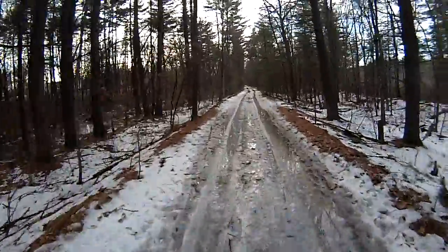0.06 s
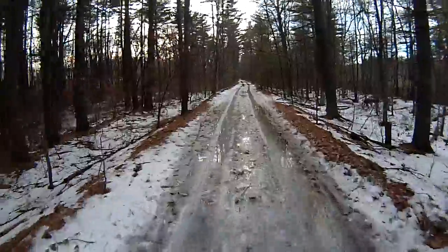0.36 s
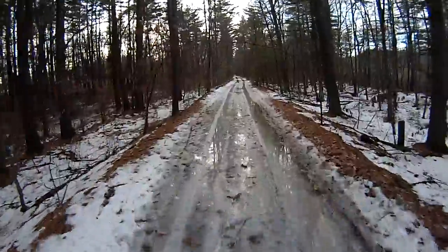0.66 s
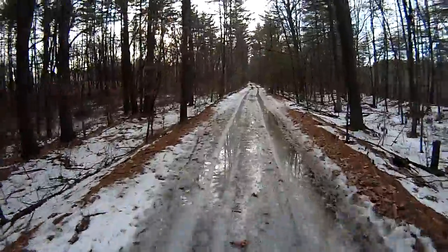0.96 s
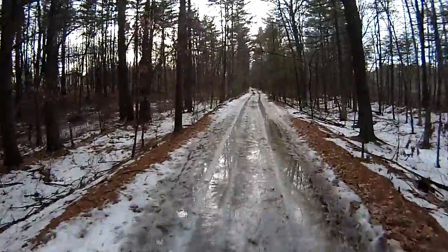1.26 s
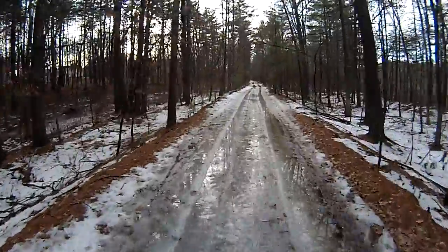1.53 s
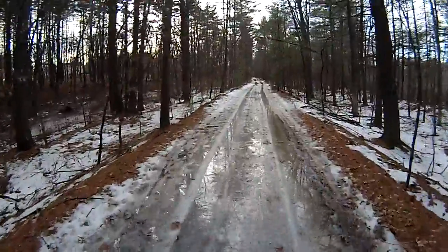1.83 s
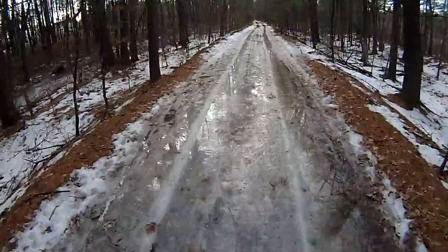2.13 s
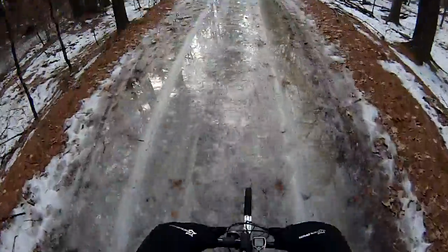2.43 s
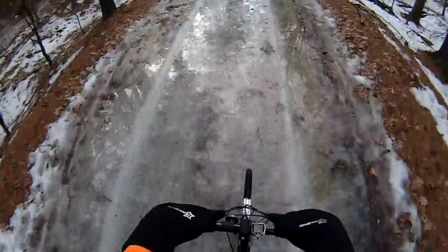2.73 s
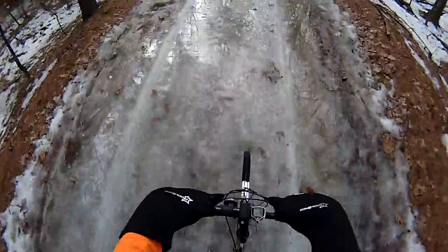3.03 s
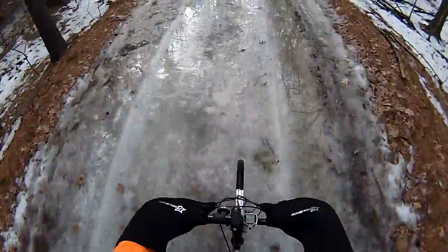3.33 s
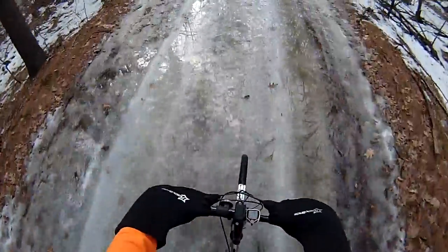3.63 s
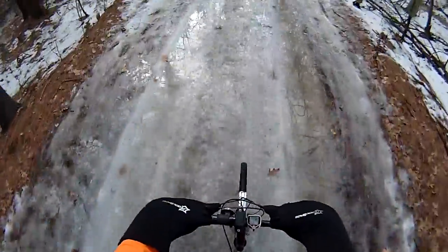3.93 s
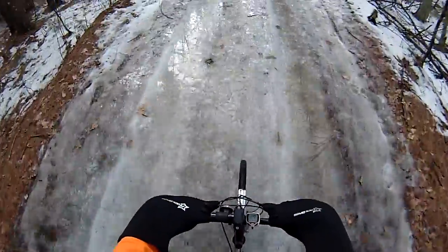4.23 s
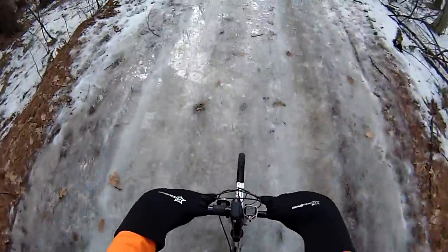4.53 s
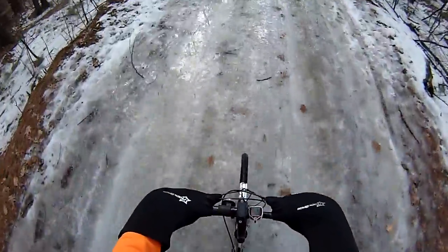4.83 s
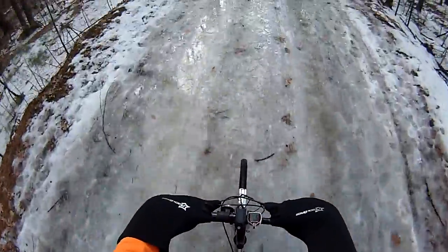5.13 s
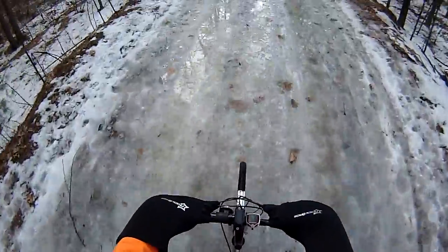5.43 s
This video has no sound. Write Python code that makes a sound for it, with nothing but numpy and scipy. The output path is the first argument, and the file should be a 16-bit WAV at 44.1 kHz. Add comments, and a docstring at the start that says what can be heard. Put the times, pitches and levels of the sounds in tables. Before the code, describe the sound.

A bicycle rolls along an icy forest trail, heard close from a microphone on the rider. Low wind rumble and the drumming of the tyres run throughout, with a gritty crackle and small snaps of thin ice. About halfway the crackle grows brighter and busier, and the crust breaks with a sharp crack and a dull thud. Short crunches continue, and the strongest gust comes near the end.

```python
"""A bicycle rolls along an icy forest trail, heard from the rider's helmet camera.
From the start, wind rumbles on the microphone while the tyres drum, grind frozen grit and snap thin ice.
Soon they crush patches of crust, and loose plates ring. After two seconds the rider looks down at the
wheel and the crackle brightens. At three seconds the crust gives way with a thud; the crunching goes on,
and the strongest gust comes near the end."""
import sys
import numpy as np
from scipy import signal
from scipy.fft import rfft, irfft
from scipy.io import wavfile
from scipy.ndimage import uniform_filter1d

SR = 44100
rng = np.random.default_rng(int(sys.argv[2]) if len(sys.argv) > 2 else 0)


def inscribe(sig):
    """Save sig as 16-bit PCM at rate SR to the path in sys.argv[1].

    A 1-D sig is mono; a 2-D sig holds one channel per row.
    Samples are clipped to [-1, 1] before scaling.
    """
    pcm = np.round(np.clip(np.atleast_2d(sig).T, -1, 1) * 32767)
    wavfile.write(sys.argv[1], SR, pcm.astype(np.int16))


N = 245637
TIME = np.arange(N) / SR
FREQS, BINS = np.fft.rfftfreq(N, 1 / SR), np.fft.rfftfreq(1024, 1 / SR)  # Hz: whole scene, one click

# Patches of crust under the tyre. Each row: start in seconds, length in seconds, level in dB.
CRUST_PATCHES = [(0.82, 0.046, -56), (1.062, 0.042, -49.5), (1.463, 0.027, -45.5), (2.941, 0.067, -45),
                 (3.044, 0.024, -37.5), (3.218, 0.037, -44.5), (3.339, 0.031, -46.5), (3.377, 0.028, -43.5),
                 (3.549, 0.03, -40.5), (3.614, 0.0065, -43.5), (3.679, 0.033, -52.5), (3.765, 0.056, -46),
                 (3.884, 0.034, -49), (3.95, 0.015, -46.5), (4.271, 0.052, -50.5), (4.413, 0.016, -45),
                 (4.555, 0.028, -47.5), (4.674, 0.028, -40), (4.846, 0.014, -55), (5.03, 0.087, -48.5),
                 (5.442, 0.01, -45)]
# Tilt of the rider's head. Each row: time in seconds, tilt from 0 (ahead) to 1 (down).
HEAD_TILT = [(0, 0), (2.1, 0), (2.7, 0.86), (5.57, 0.9)]


def amp(db):
    """Decibels to amplitude ratio."""
    return 10 ** (np.asarray(db) / 20)


def unit(x):
    """Normalisation to rms 1."""
    return x / np.sqrt(np.mean(x ** 2) + 1e-20)


def curve(rows, s):
    """Linear interpolation of a time table at the times s."""
    rows = np.array(rows)
    return np.interp(s, rows[:, 0], rows[:, 1])


def spectrum(rows, hz, column=1):
    """Interpolation of a spectrum on a log-frequency axis."""
    rows = np.array(rows)
    return np.interp(np.log(hz + 1), np.log(rows[:, 0] + 1), rows[:, column])


def resonance(hz, half_width_hz):
    """Lorentzian curve of one resonance, 1 at its centre."""
    return 1 / (1 + ((BINS - hz) / half_width_hz) ** 2)


def add(mix, s, sound):
    """Superposition of a sound on the mix at time s."""
    part = mix[max(round(s * SR), 0):][:len(sound)]
    part += sound[:len(part)]


def noise(rows):
    """Stationary noise of rms 1, shaped by rows of frequency in Hz and level in dB."""
    return unit(irfft(rfft(rng.standard_normal(N)) * amp(spectrum(rows, FREQS)), N))


def wander(rate_hz):
    """Random fluctuation of rms 1, low-passed at rate_hz."""
    return unit(irfft(rfft(rng.standard_normal(N)) / (1 + (FREQS / rate_hz) ** 2), N))


def click(colour_db):
    """Minimum-phase pulse of energy 1: the sharpest causal pulse with this spectrum."""
    log_gain = np.log(amp(np.r_[colour_db, colour_db[-2:0:-1]]))
    pulse = np.fft.ifft(np.exp(np.conj(signal.hilbert(log_gain)))).real
    return pulse / np.linalg.norm(pulse)


def low_pass(x, hz, taps):
    """Steep windowed-sinc low-pass of both channels."""
    return signal.oaconvolve(x, signal.firwin(taps, hz, window=("kaiser", 8), fs=SR)[None], "same")


def wheel_cycle(peak_s, per_turn, turn_hz=2.37):
    """Periodic modulation at a harmonic of the wheel's rotation."""
    return np.cos(2 * np.pi * per_turn * turn_hz * (TIME - peak_s))


def hiss():
    """Self-noise of the microphone: a faint, steady floor."""
    # Each row: frequency in Hz, relative level in dB.
    colour = [(500, -6), (3000, 2.5), (5000, -4), (6000, -16)]
    return amp(-65.5) * noise(colour)


def wind(gust_width_s=0.028):
    """Turbulent pressure on the microphone: random buffets and gusts over a steady headwind."""
    # Spectra of the buffets and the headwind. Each row: frequency in Hz, relative level in dB.
    buffet_colour = [(20, -29), (40, -9), (60, 1), (90, 0.5), (130, -4), (200, -19), (400, -52)]
    headwind_colour = [(6, -22), (16, -10.5), (30, 8.5), (45, 3), (70, 2), (200, -57)]
    # Strength of the breeze. Each row: time in seconds, level in dB.
    breeze = [(0, -47.5), (1.0, -45), (1.3, -48.5), (2.05, -46), (2.5, -42), (2.7, -48), (3.15, -43),
              (3.8, -49.5), (4.45, -43.5), (5.0, -47), (5.57, -45)]
    # Stronger gusts. Each row: time of the peak in seconds, rise over the breeze in dB.
    gusts = [(1.04, 5.5), (2.38, 4.5), (5.18, 10), (5.51, 5.5)]
    gust_db = sum(db * np.exp(-.5 * ((TIME - s) / gust_width_s) ** 2) for s, db in gusts)
    level_db = curve(breeze, TIME) + gust_db + 2.04 * wander(rate_hz=7.6)
    return noise(buffet_colour) * amp(level_db) + amp(-49.5) * noise(headwind_colour)


def tyre_rumble(lurch_db=0.9):
    """Rolling noise: surface roughness drives the tyres, which drum harder once in each turn."""
    # Spectrum of the drumming. Each row: frequency in Hz, relative level in dB.
    colour = [(70, -37), (120, -1.5), (165, 1.5), (230, -3.5), (320, -6), (430, -9), (600, -16), (900, -23),
              (2000, -55), (5000, -92)]
    # Rough ice is loud, smooth ice quiet. Each row: time in seconds, level in dB.
    roughness = [(0, -48.5), (1.65, -47.5), (2.15, -44.5), (3.07, -43), (3.5, -42.5), (3.62, -50),
                 (3.88, -45), (4.05, -48), (4.3, -44), (4.95, -46.5), (5.12, -42.5), (5.57, -44.5)]
    drumming = unit(noise(colour) * amp(2.05 * wander(rate_hz=42)))
    return drumming * amp(curve(roughness, TIME) + lurch_db * wheel_cycle(peak_s=0.061, per_turn=1))


def echoes(x, t60, wet_db):
    """Scattering: sparse reflections of random sign that decay exponentially."""
    t = np.arange(SR // 2) / SR
    taps = rng.standard_normal(len(t)) * (rng.random(len(t)) < .06)
    taps *= (t > .001) * amp(-60 * t / t60)
    return amp(wet_db) * signal.oaconvolve(x, taps / np.linalg.norm(taps))[:N]


def fracture_db(tilt):
    """Directional hearing: a fracture sounds brighter facing down and has a resonance facing ahead."""
    # Spectrum of a fracture. Each row: frequency in Hz, level in dB facing ahead, level in dB facing down.
    colour = [(149, -5, -10), (490, 0.5, -6), (733, 0, -6), (1130, 3, -0.5), (1440, -0.5, 1),
              (2110, -4, -2.5), (2670, -4.5, 3), (3290, -6.5, -1), (4460, -12, -5), (5410, -17.5, -12),
              (6280, -27, -21)]
    ahead = spectrum(colour, BINS) + 7.5 * resonance(2027, half_width_hz=124)
    return (1 - tilt) * ahead + tilt * spectrum(colour, BINS, column=2)


def chips(per_s, spread_db, ring_db, db_per_octave, sizes=32):
    """Shot noise of tiny fractures: each size of chip resonates briefly at its own pitch."""
    strength = amp(spread_db * np.minimum(rng.exponential(1, N), 3)) * rng.choice([-1, 1], N)
    impulses = unit(strength * (rng.random(N) < per_s / SR))
    size = rng.integers(0, sizes, N)
    tilt, out = curve(HEAD_TILT, TIME), np.zeros(N)
    octaves = np.log2((BINS + 200) / 2000)
    for k, pitch in enumerate(np.geomspace(900, 4600, sizes)):
        chip_db = ring_db * resonance(pitch, 0.064 * pitch) + db_per_octave * octaves
        for facing, share in enumerate([1 - tilt, tilt]):  # crossfade from ahead to down
            pulse = click(fracture_db(facing) + chip_db)
            out += signal.oaconvolve(impulses * (size == k) * share, pulse)[:N]
    return out


def grit(bite_db=0.77):
    """Friction: the tread grinds clumps of grains over an even sizzle, biting harder twice a turn."""
    # Strength of the grinding. Each row: time in seconds, level in dB.
    grinding = [(0, -55.5), (0.65, -58.5), (1.4, -55), (2.4, -57.5), (3.25, -53.5), (3.9, -55), (4.9, -54),
                (5.57, -52)]
    grains = chips(per_s=550, spread_db=5, ring_db=10, db_per_octave=-0.5)
    clumps = unit(grains * amp(5 * np.tanh(wander(rate_hz=11.7))))
    sizzle = chips(per_s=9000, spread_db=2, ring_db=0.5, db_per_octave=-2.5) * amp(wander(rate_hz=29))
    level_db = curve(grinding, TIME) + bite_db * wheel_cycle(peak_s=0.0085, per_turn=2)
    return amp(level_db) * (amp(-0.5) * clumps + amp(-2) * sizzle)


def crunches(rise_s=0.0022, release_s=0.0074):
    """Crushing: loaded crust collapses in a shower of fractures that dies as the tyre leaves it."""
    load, t = np.zeros(N), np.arange(SR // 8) / SR
    for s, length, db in CRUST_PATCHES:
        release = np.exp(-np.maximum(t - length, 0) / release_s)
        add(load, s, amp(db) * np.minimum(t / rise_s, 1) * release)
    return amp(-0.14) * load * chips(per_s=1900, spread_db=5.5, ring_db=12.5, db_per_octave=2.5)


def plinks(t60=0.024, rise_s=0.0011):
    """Damped vibration: a freed plate of ice chatters into one short, slightly unsteady note."""
    # Each row: start in seconds, pitch in Hz, relative level in dB.
    plates = [(1.481, 2175, -39), (3.393, 3120, -29), (3.566, 3150, -34), (3.807, 2570, -30),
              (3.954, 2780, -32), (4.277, 2470, -28.5), (4.853, 2450, -36.5), (5.531, 2660, -37)]
    out, t = np.zeros(N), np.arange(SR // 16) / SR
    for s, hz, db in plates:
        pitch = hz * (1 + 0.24 * uniform_filter1d(rng.standard_normal(len(t)), size=60))
        envelope = amp(db - 60 * t / t60) * (1 - np.exp(-t / rise_s))
        add(out, s, envelope * np.sin(2 * np.pi * np.cumsum(pitch) / SR))
    return amp(4.5) * out


def thuds(rise_s=0.00049):
    """Modal ringing: tyre and rim give a dull knock as the wheel drops through the crust."""
    # Modes of the wheel. Each row: frequency in Hz, relative level in dB, 60 dB decay time in seconds.
    modes = [(176, -13, 0.22), (360, -6, 0.032), (444, 1.5, 0.023), (653, -8, 0.0134)]
    # Each row: start in seconds, relative level in dB.
    impacts = [(3.0500, -30.5), (3.0645, -20)]
    out, t = np.zeros(N), np.arange(SR // 5) / SR
    ring = sum(amp(db - 60 * t / t60) * np.sin(2 * np.pi * hz * t) for hz, db, t60 in modes)
    for s, db in impacts:
        add(out, s, amp(db + 2) * ring * (1 - np.exp(-t / rise_s)))
    return out


def trail_ticks(per_s=15, level_db=-42, facing_down_db=4, count=160):
    """A random point process of small breaks all along the trail, as rows for snaps()."""
    s = np.cumsum(rng.gamma(2, .5, count)) / per_s
    size, thickness = rng.standard_normal((count, 2)).T
    db = level_db + facing_down_db * curve(HEAD_TILT, s) + 1.55 * size
    return np.column_stack([s, db, 4 + 9.5 * thickness])


def crust_cracks(per_s=55, over_patch_db=10, count=8):
    """Stepwise failure: a patch of crust gives way in a few harder cracks, as rows for snaps()."""
    rows = []
    for start, length, db in CRUST_PATCHES:
        delay = np.cumsum(rng.gamma(2, .5, count)) / per_s
        size, thickness = rng.standard_normal((count, 2)).T
        steps = np.column_stack([start + delay, db + over_patch_db + 2 * size, 9.5 * thickness])
        rows.extend(steps[delay < length])
    return rows


def snaps(crumb_s=0.0012, body_hz=1900, bass_hz=650, ring_db=7):
    """Brittle fracture: a sharp break and its crumbs excite a plate's resonance; thick ice sounds lower."""
    # The loudest breaks. Each row: start in seconds, level in dB over 1 ms, body in dB (more if thick).
    loudest = [(0.1501, -35, -18), (0.1842, -39.5, -17), (0.4809, -40, 2), (0.9315, -36.5, 5),
               (1.09, -37, -8), (1.2232, -36, -7), (1.2806, -38, 13), (1.3325, -34.5, -6),
               (1.4815, -31.5, -4), (1.6732, -34, 7), (1.7522, -33, 8), (2.0254, -31, -8),
               (2.4815, -35.5, 13), (2.5745, -36.5, 1), (2.5985, -30.5, -21), (2.6496, -32, -29),
               (2.88, -29.5, -1), (2.8967, -30, 6), (2.9066, -28.5, 7), (2.9605, -32, 14), (2.988, -27, 19),
               (3.0012, -26.5, -34), (3.0267, -26.5, -22), (3.0509, -20.5, -9), (3.0648, -24.5, 6),
               (3.1149, -29.5, -2.5), (3.2281, -32.5, 8), (3.3332, -33, -13), (3.4068, -30.5, -26),
               (3.5561, -31, 0), (3.6203, -30, 6), (3.7991, -29, -5), (3.9542, -27, 2), (4.026, -32, -5),
               (4.2058, -31, 5), (4.2789, -31.5, 12), (4.419, -30, -3), (4.6822, -31.5, -12),
               (4.7293, -33.5, 5), (5.0849, -28, 16), (5.2574, -30, 1), (5.262, -29.5, 0),
               (5.2976, -40, 10), (5.3162, -35.5, 30), (5.3595, -36.5, 29), (5.4549, -24.5, 3),
               (5.487, -27.5, 8)]
    out, t = np.zeros(N), np.arange(512) / SR
    slope_db = -0.8 * np.log2(BINS + 200)
    radiation_db = -7 / (1 + (BINS / bass_hz) ** 4)  # small plates radiate little bass
    for s, db, body_db in [*loudest, *trail_ticks(), *crust_cracks()]:
        in_crust = any(start <= s <= start + length for start, length, _ in CRUST_PATCHES)
        crumb_share = 0.33 if in_crust else 0.13  # of the excitation's energy
        crumbs = rng.standard_normal(len(t)) * (rng.random(len(t)) < .2)
        crumbs *= np.sqrt(t) * np.exp(-t / crumb_s)
        excitation = crumbs * np.sqrt(crumb_share) / (np.linalg.norm(crumbs) + 1e-9)
        excitation[0] += np.sqrt(1 - crumb_share)  # the break itself
        pitch = rng.uniform(1510, 3600)
        thickness_db = (body_db - 4) / (1 + (BINS / body_hz) ** 4)
        plate_db = thickness_db + ring_db * resonance(pitch, 0.089 * pitch)
        colour_db = fracture_db(curve(HEAD_TILT, s)) + plate_db + slope_db + radiation_db
        snap = np.convolve(excitation, click(colour_db))
        add(out, s, amp(db) * snap * np.sqrt(SR / 1000) / np.linalg.norm(snap))
    return out


def scene():
    """Superposition at one microphone, which feeds both channels; only the ice sounds are reflected."""
    ice = grit() + crunches() + snaps() + plinks()
    off_bike_and_rider = echoes(ice, t60=0.053, wet_db=-17.5)
    off_trees = echoes(ice, t60=0.23, wet_db=-19)
    mono = ice + off_bike_and_rider + off_trees + thuds() + wind() + tyre_rumble() + hiss()
    return np.array([mono, mono])


def record(dry, hold_hz=12000, leak_db=-1):
    """Spectral imaging: the camera's slow sample-and-hold mirrors the crackle into a glassy treble."""
    # Response of the camera's output. Each row: frequency in Hz, gain in dB.
    response = [(3500, 0), (5000, 0), (7000, -3), (9500, -0.5), (12000, -1.5), (16000, -2.5)]
    narrow = low_pass(dry, hold_hz / 2, taps=129)
    sampled = narrow * (1 + 2 * np.cos(2 * np.pi * hold_hz * TIME))  # images on both sides of hold_hz
    held = rfft(sampled) * np.sinc(FREQS / hold_hz)  # the stair steps weaken the images
    leak = amp(leak_db) * rfft(dry - narrow)  # the sharpest edges keep some treble of their own
    coloured = irfft((held + leak) * amp(spectrum(response, FREQS)), N)
    hiss_colour = [(500, -7), (4000, -10), (6000, 9.5), (9000, -6), (16000, 5)]
    channel_hiss = amp(-77.5) * np.array([noise(hiss_colour) for _ in dry])
    return low_pass(coloured + channel_hiss, hz=15950, taps=511)


dry = scene()
out = record(dry)
inscribe(out)
```